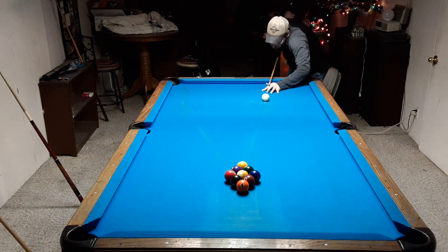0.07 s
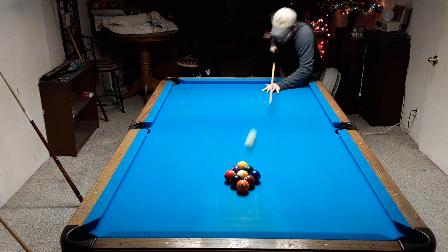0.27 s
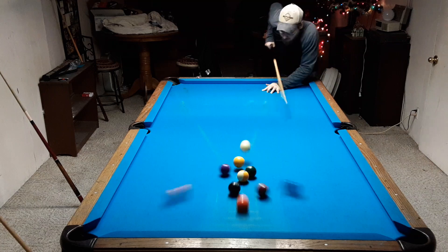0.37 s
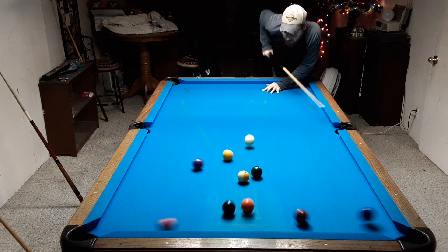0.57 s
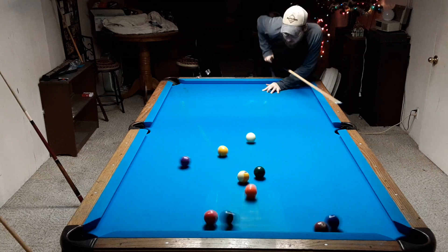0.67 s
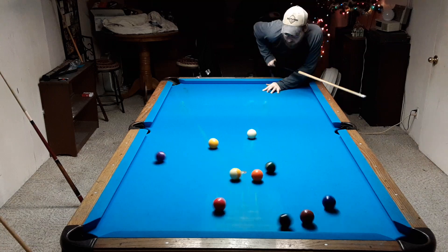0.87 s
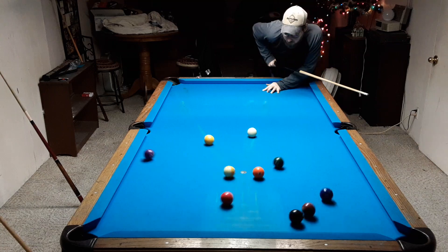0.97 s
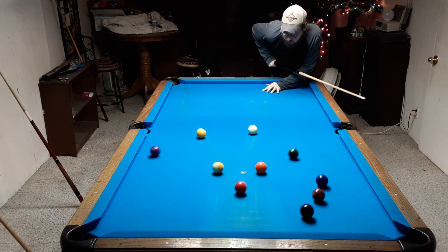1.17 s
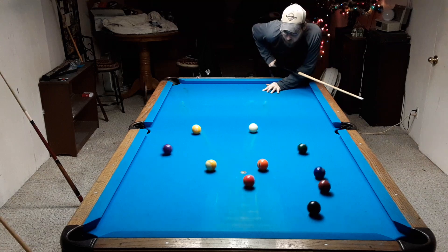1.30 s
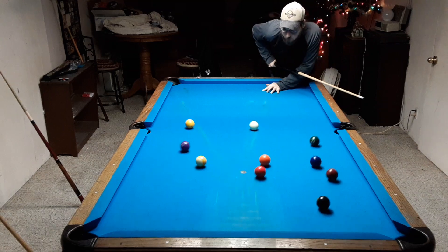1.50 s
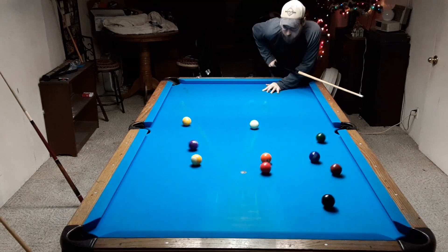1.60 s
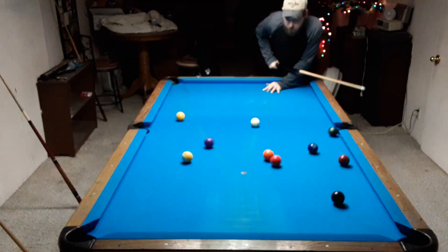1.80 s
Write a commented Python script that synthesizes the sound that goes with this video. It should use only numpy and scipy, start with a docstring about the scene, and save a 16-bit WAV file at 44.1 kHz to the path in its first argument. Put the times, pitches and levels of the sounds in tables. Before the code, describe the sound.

A pool break, heard from the foot of the table. The cue knocks the cue ball at about 0.2 seconds, and the rack splits with a loud crack near 0.4. Balls rumble and thump against the cushions until about 0.8, with sharp clicks between 0.7 and 1 second. A couple of faint bumps follow, and the rolling fades by 1.3. The small room adds short echoes and a low boom.

```python
"""A cue cracks against the ball: a pool break, with the microphone at the foot of the table.
The cue ball lands on the slate and smashes the rack; balls thump the cushions, click together and roll.
Each blow is a short pulse, and the shaft, the balls and the table's frame ring at their own modes.
The room is small and hard-walled, so echoes come back from close by and its low modes boom.
The recorder's limiter ducks after the smash."""
import sys
import numpy as np
from scipy import signal
from scipy.fft import rfft, irfft
from scipy.io import wavfile
from scipy.ndimage import uniform_filter1d, minimum_filter1d

SR = 44100
rng = np.random.default_rng(int(sys.argv[2]) if len(sys.argv) > 2 else 0)


def store_pcm(level_fs):
    """Save levels as 16-bit WAV."""
    pcm = np.round(np.clip(level_fs, -1, 1) * 32767).astype(np.int16)
    wavfile.write(sys.argv[1], SR, np.atleast_2d(pcm).T)


N = 81585

# first echoes off table, ceiling and walls: delay_s, level_db
ECHOES = [(.0019, -11.5), (.0064, -7.5), (.0076, -2.5), (.0142, -9), (.0162, -7.5), (.027, -11.5)]
# decay of the room: band_hz, t60_s
ROOM_DECAY = [(80, 0.71), (200, 0.56), (600, .4), (1500, .39), (2800, 0.39), (5000, .31), (8000, .28),
              (15000, 0.14)]
# still air at the microphone: band_hz, level_db
AIR_COLOUR = [(30, -27.5), (50, -3), (75, -2.5), (160, -2), (300, -16), (600, -33.5), (1200, -36),
              (4000, -43), (7500, -39.5), (15000, -42)]
# course of the room's boom: time_s, level_db
BOOM_LEVEL = [(0, -76), (.19, -70), (.25, -28), (.5, -32.5), (.78, -33.5), (.87, -48.5), (.97, -39),
              (1.1, -49.5), (1.26, -55), (1.31, -78.5), (1.6, -68), (1.69, -56), (1.85, -50)]
# course of the rolling rumble: time_s, level_db
ROLL_LEVEL = [(0, -75), (.19, -74), (.23, -40), (.45, -33), (.8, -33), (.92, -49), (1.08, -56.5),
              (1.24, -51.5), (1.32, -76.5), (1.6, -80.5), (1.85, -67.5)]
# balls rolling over slate: band_hz, level_db
ROLL_COLOUR = [(30, -29.5), (60, -15), (88, 4), (120, -5), (180, 4), (280, -6), (450, -8.5), (700, -15),
               (1200, -28.5), (3000, -46), (8000, -68.5)]
# balls against slate and cushions, a lower corner for a softer contact: start_s, level_db, corner_hz
THUMPS = [(.322, -13, 1300), (0.339, -20.5, 810), (.470, -21.5, 1470), (0.5999, -14, 5000),
          (.612, -16.5, 2040), (.644, -19.5, 2500), (.679, -25, 2470), (.698, -23, 1270),
          (.741, -19.5, 1730), (.785, -23.5, 1180), (0.829, -25, 1330), (1.136, -38.5, 620),
          (1.165, -42, 416), (1.326, -63.5, 200)]
# the table's thump: band_hz, level_db
THUMP_COLOUR = [(35, -42.5), (65, -19.5), (90, -10.5), (125, -10), (180, 1), (290, -8.5), (450, 4),
                (680, 3), (1050, -7), (2000, -14), (3200, -25.5), (5000, -43.5), (9000, -66.5),
                (16000, -78)]
# modes of the table's frame and bed: pitch_hz, level_db, t60_s
FRAME_MODES = [(154, -6, .3), (178.9, -2, 0.31), (225.6, -1.5, 0.65), (389.4, -2, .58), (412, -7, 0.38),
               (454, -7, 0.23), (483, -8.5, 0.38), (537, -7, .2), (592, -5.5, 0.41), (665, -2, .22),
               (676, 1.5, .3), (769, -4.5, .28), (867, -10.5, 0.3)]
# thin ring of the balls: pitch_hz, level_db, t60_s
BALL_MODES = [(4520, -10, .004), (6800, -6.5, .004), (7400, -5, .004), (9300, -5, 0.0025),
              (11500, -2.5, .004), (12500, -5.5, .003), (14200, -0.5, .007), (14800, -0.5, .006)]
# ball against ball: start_s, level_db, direct_db, echo_db, delay_ratio, brightness_ratio, ring_db
CLICKS = [(.728, -7, -8, 7, 0.95, .95, 5), (0.8554, -14, 4, 0, 0.99, .92, -1),
          (0.9892, -21.5, -3.5, 8.5, 1.08, 0.86, 2.5)]
# a click: band_hz, level_db
CLICK_COLOUR = [(60, -32), (300, -18.5), (800, -5.5), (1500, -1.5), (2200, 0.5), (2850, 0.5), (3900, -18),
                (5500, -29.5), (8500, -48.5), (12000, -51), (15500, -56.5)]
# faint contacts: start_s, level_db, ring_db
TICKS = [(0.517, -38, 6.5), (0.601, -41.5, -7), (0.643, -43.5, -7), (.825, -48.5, 31)]
# a tick: band_hz, level_db
TICK_COLOUR = [(1000, -11), (3000, -4), (5500, -5.5), (7300, -1.5), (8500, -20), (15000, -20.5)]
# the stick sliding through the fingers: band_hz, level_db
SLIDE_COLOUR = [(40, -20), (150, -0.5), (600, -10.5), (2000, -29), (8000, -40.5), (15000, -49)]
# the blow of the cue's tip: band_hz, level_db
TIP_COLOUR = [(40, -41.5), (90, -17), (180, 1.5), (300, -5), (650, 5.5), (1200, -10), (2300, -13),
              (3800, -21), (7400, -24.5), (9000, -37), (15500, -31.5)]
# modes of the cue's shaft: pitch_hz, level_db, t60_s
SHAFT_MODES = [(185.4, 3, .1), (413.4, -7, 0.46), (528, -4.5, 0.099), (589, -2.5, 0.13), (655.4, 0, 0.083),
               (845, -3, 0.11), (1072, 0.5, .16), (1250, -6, 0.14), (1405, -13.5, 0.22), (2030, -5, 0.14),
               (2359, -5, .13), (3110, -11.5, 0.27), (3456, -21, 0.32), (4560, -17.5, 0.27),
               (5060, -17, .12), (5270, -18, .12), (6330, -19, 0.25), (7300, -21, 0.15), (7460, -17, 0.25)]
# contacts as the cue ball hits the rack: start_s, level_db, brightness_ratio
SMASH_CONTACTS = [(0.3676, 10.5, 1), (.3693, 5, 1.25)]
# the crack of the rack: band_hz, level_db
SMASH_COLOUR = [(60, -37.5), (600, -10.5), (1650, -16), (2050, -0.5), (2400, 0.5), (3000, -5),
                (4000, -22.5), (5500, -24.5), (8500, -46), (11500, -32.5), (15500, -42.5)]


def undb(db):
    return 10 ** (np.asarray(db) / 20)


def seconds():
    return np.arange(N) / SR


def unit(x):
    """Scale to unit energy."""
    return x / np.sqrt(np.sum(x ** 2))


def fade(t60_s):
    return np.exp(-np.log(1000) * seconds() / t60_s)


def rise(attack_s):
    return 1 - np.exp(-seconds() / attack_s)


def envelope(points):
    """Gain through (time_s, level_db) points."""
    return undb(np.interp(seconds(), *np.array(points).T))


def read(points, hz):
    """Join (band_hz, value) points on a log-frequency axis."""
    band_hz, values = np.array(points, float).T
    return np.interp(np.log(np.maximum(hz, 1)), np.log(band_hz), values)


def conv(a, b):
    return signal.fftconvolve(a, b)[:N]


def add(out, start_s, x):
    i = int(start_s * SR)
    out[i:i + len(x)] += x[:N - i]


def noise(colour):
    """Coloured noise, rms 1."""
    gain = undb(read(colour, np.fft.rfftfreq(N, 1 / SR)))
    x = irfft(rfft(rng.standard_normal(N)) * gain, N)
    return x / x.std()


def blow(colour, brightness=1, shade_db=lambda hz: 0, size=4096):
    """The shortest causal pulse with the given colour, peak 1."""
    hz = np.fft.rfftfreq(size, 1 / SR)
    cepstrum = irfft(np.log(undb(read(colour, hz / brightness) + shade_db(hz))))
    cepstrum[1:size // 2] *= 2  # fold to minimum phase
    cepstrum[size // 2 + 1:] = 0
    pulse = irfft(np.exp(rfft(cepstrum)))
    return pulse / np.abs(pulse).max()


def rattle(t60_s, attack_s, size=16384):
    """A swelling, decaying spray of tiny impulses with an even spectrum."""
    shape = (fade(t60_s) * rise(attack_s))[:size]
    x = rng.standard_normal(size)
    for _ in range(6):  # even out the spectrum, then the level
        x = irfft(np.exp(1j * np.angle(rfft(x * shape))))
        x = x / np.sqrt(np.abs(uniform_filter1d(x ** 2, SR // 400)) + 1e-14)
    return np.pad(unit(x * shape), (0, N - size))


def ring(modes, scatter_db=0):
    """Decaying modes, each struck with its own sign and strength."""
    t, draws = seconds(), rng.standard_normal((len(modes), 2))
    return sum(np.sign(side) * undb(db + scatter_db * force) * np.sin(2 * np.pi * hz * t) * fade(t60_s)
               for (hz, db, t60_s), (side, force) in zip(modes, draws))


def room(echo_db, delay_ratio=1):
    """Close, hard surfaces return a few sharp echoes and a diffuse tail whose treble dies first."""
    hz, spray = np.fft.rfftfreq(N, 1 / SR), rfft(rng.standard_normal(N))
    band_hz, decays_s = zip(*ROOM_DECAY)
    tail = np.zeros(N)
    for weights, t60_s in zip(np.eye(len(band_hz)), decays_s):
        band = read(list(zip(band_hz, weights)), hz)
        tail += irfft(spray * band, N) * fade(t60_s)
    response = unit(tail * rise(attack_s=.0031))
    for delay_s, db in ECHOES:
        add(response, delay_s * delay_ratio, undb([db + echo_db - 3]))
    return response


def in_room(x, wet_db):
    """Each place on the table has its own path through the room to the microphone."""
    return x + undb(wet_db) * conv(x, room(echo_db=-6))


def room_tone():
    """Still air, faint and mostly bass."""
    return undb(-68.5) * noise(AIR_COLOUR)


def room_boom(pitch_hz=86.86, wander_hz=3):
    """The balls keep a low resonance booming; its pitch wavers."""
    hz = pitch_hz + wander_hz * noise([(4, 0), (12, -10), (40, -60)])
    return envelope(BOOM_LEVEL) * np.sqrt(2) * np.sin(2 * np.pi * np.cumsum(hz) / SR)


def rolling():
    """Balls rumble over the slate."""
    return envelope(ROLL_LEVEL) * noise(ROLL_COLOUR)


def bass_swell(centre_s=.388, width_s=.016, pitch_hz=45):
    """One deep swell of bass follows the smash."""
    t = seconds() - centre_s
    return undb(-28) * np.exp(-(t / width_s) ** 2) * np.sin(2 * np.pi * pitch_hz * t)


def thumps(attack_s=.0059):
    """Balls sink into cloth and rubber; the table rattles briefly and its frame rings on."""
    out = np.zeros(N)
    for start_s, db, corner_hz in THUMPS:
        soften_db = lambda hz: -13.5 * np.log10(1 + (hz / corner_hz) ** 4)
        push = blow(THUMP_COLOUR, shade_db=soften_db)
        knock = unit(conv(rattle(t60_s=.09, attack_s=attack_s), push))
        modes = [(hz, mode_db + soften_db(hz), t60_s) for hz, mode_db, t60_s in FRAME_MODES]
        frame = undb(-4) * unit(ring(modes, scatter_db=.5) * rise(attack_s))
        thump = in_room(knock, wet_db=-5.5) + frame
        add(out, start_s, undb(db) * thump * np.sqrt(SR / 100))  # unit energy to rms 1 over 10 ms
    return out


def ball_ring(ring_db):
    """The brief glassy ring of struck balls."""
    x = ring(BALL_MODES)[:4096]
    return undb(ring_db - 30.5) * x / np.abs(x).max()


def clicks(wet_db=-1, ring_wet_db=-1.5):
    """A pulse beams along the line of contact, so its echoes can outdo it; the ring spreads evenly."""
    contacts = [(start_s, db, direct_db, room(echo_db, delay), blow(CLICK_COLOUR, brightness), ring_db)
                for start_s, db, direct_db, echo_db, delay, brightness, ring_db in CLICKS]
    contacts += [(start_s, db, 0, room(echo_db=1.5), blow(TICK_COLOUR), ring_db)
                 for start_s, db, ring_db in TICKS]
    out = np.zeros(N)
    for start_s, db, direct_db, path, pulse, ring_db in contacts:
        ringing = ball_ring(ring_db)
        direct = undb(direct_db) * pulse + ringing
        reflected = conv(path, pulse + undb(ring_wet_db) * ringing)
        add(out, start_s, undb(db) * direct)
        add(out, start_s, undb(db + wet_db) * reflected)
    return out


def cue_stroke(strike_s=.2255, slide_s=.028, attack_s=.002):
    """The stick slides through the fingers; the tip's blow rattles it and rings the shaft's modes."""
    crack = undb(-10) * unit(conv(rattle(t60_s=.08, attack_s=attack_s), blow(TIP_COLOUR)))
    shaft = undb(-16) * unit(ring(SHAFT_MODES) * rise(attack_s))
    strike = in_room(crack, wet_db=-1.5) + in_room(shaft, wet_db=-6)
    slide = np.interp(seconds(), [strike_s - slide_s, strike_s], [0, 1], right=0)
    out = undb(-50) * slide * noise(SLIDE_COLOUR)
    add(out, strike_s, strike * np.sqrt(SR / 100))
    return out


def rack_smash():
    """The blow runs through the tight rack in a few milliseconds and floods the room."""
    out = np.zeros(N)
    for start_s, db, brightness in SMASH_CONTACTS:
        add(out, start_s, undb(db) * blow(SMASH_COLOUR, brightness))
    path = room(echo_db=-5)
    clack = blow(CLICK_COLOUR, brightness=1.054) + ball_ring(ring_db=-4)
    add(out, SMASH_CONTACTS[0][0], undb(10.5) * conv(path, clack))
    return out


def scene():
    """The break as it reaches one microphone at the foot of the table."""
    blows = cue_stroke() + rack_smash() + clicks() + thumps()
    background = bass_swell() + room_boom() + rolling() + room_tone()
    return (blows + background)[None]


def record(dry):
    """The recorder's look-ahead limiter drops at once, holds and recovers steadily; the top is cut."""
    lookahead_s, hold_s, release_db_per_s, top_hz = .005, .0068, 200, 15700
    ahead, hold = int(lookahead_s * SR), int(hold_s * SR)
    over_db = 20 * np.log10(np.maximum(np.abs(dry[0]), 1))
    held_db = np.roll(-minimum_filter1d(-over_db, ahead + hold), (hold - ahead) // 2)
    ramp_db = release_db_per_s * seconds()
    released_db = np.maximum.accumulate(held_db + ramp_db) - ramp_db
    cut_db = uniform_filter1d(released_db, size=64)
    lowpass = signal.ellip(8, .2, 70, top_hz, fs=SR, output="sos")
    return signal.sosfilt(lowpass, dry * undb(-cut_db))


dry = scene()
out = record(dry)
store_pcm(out)
```